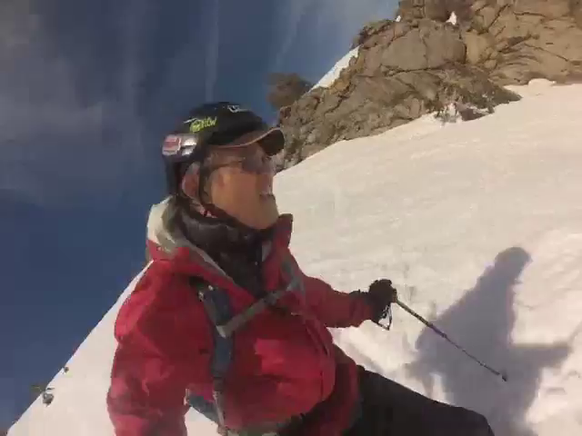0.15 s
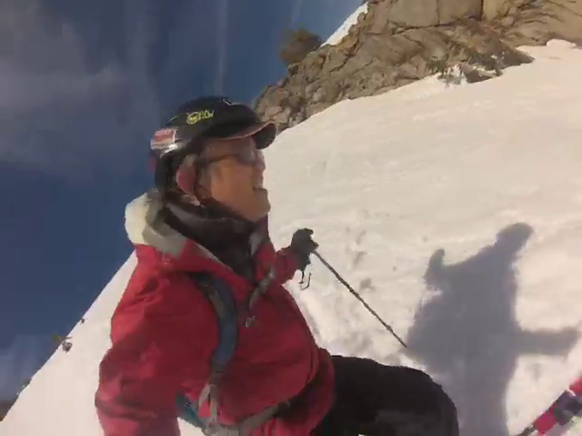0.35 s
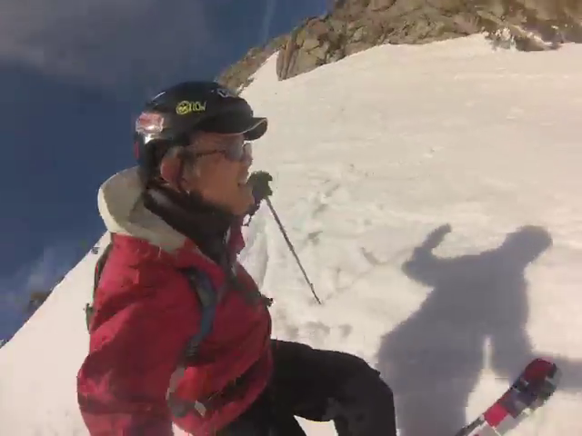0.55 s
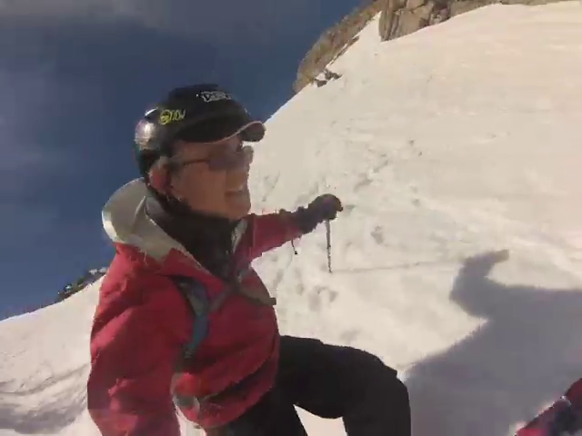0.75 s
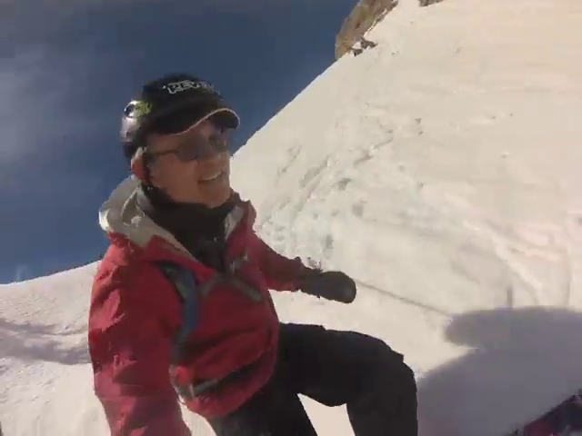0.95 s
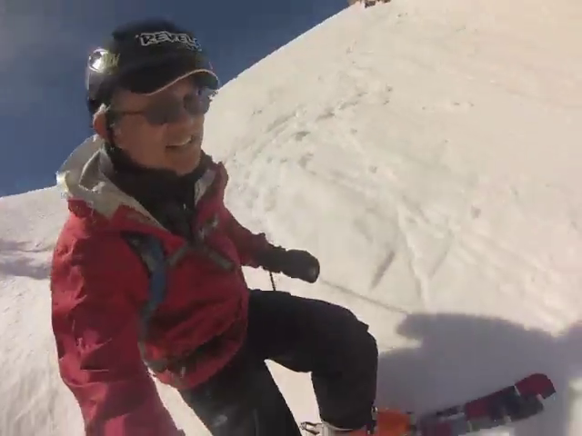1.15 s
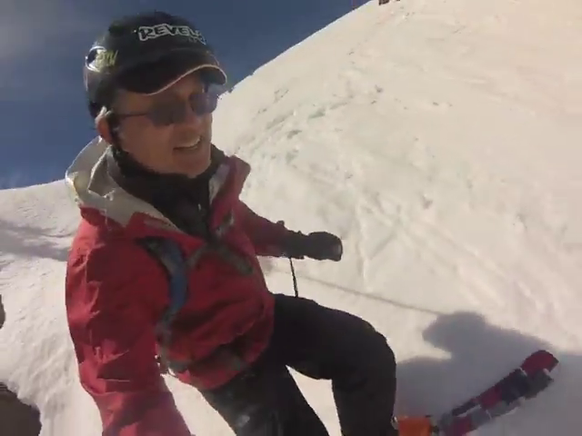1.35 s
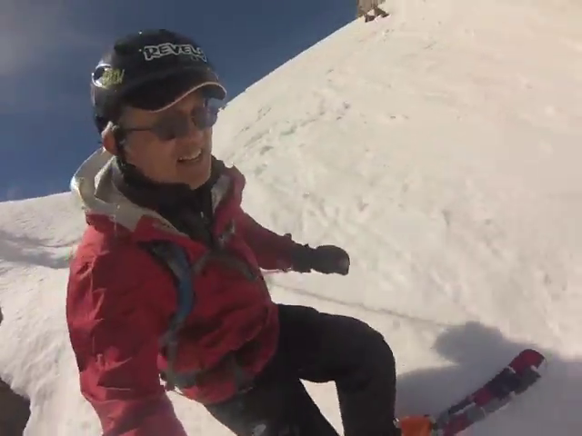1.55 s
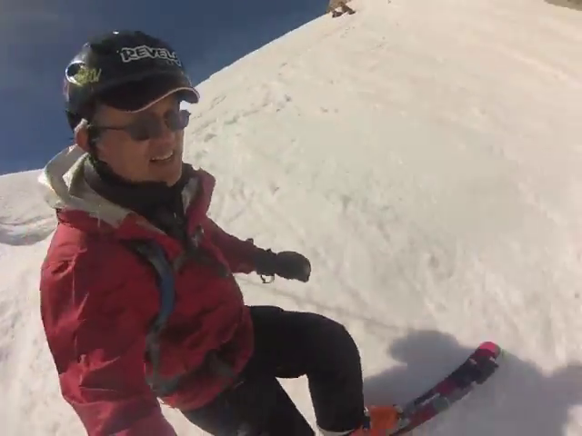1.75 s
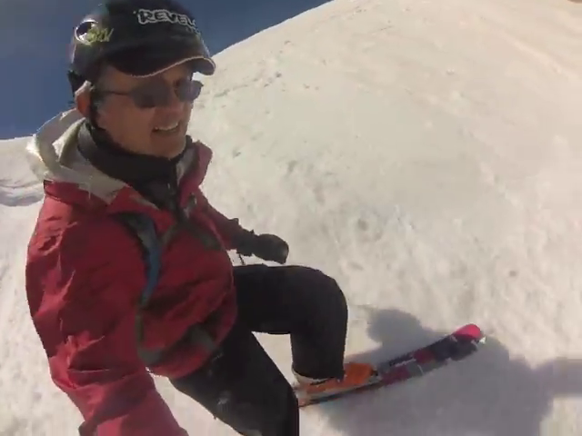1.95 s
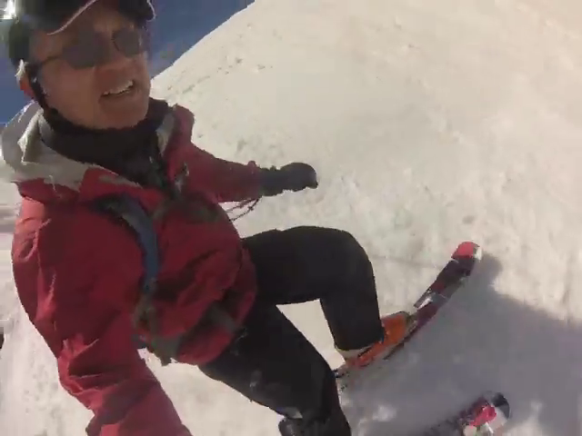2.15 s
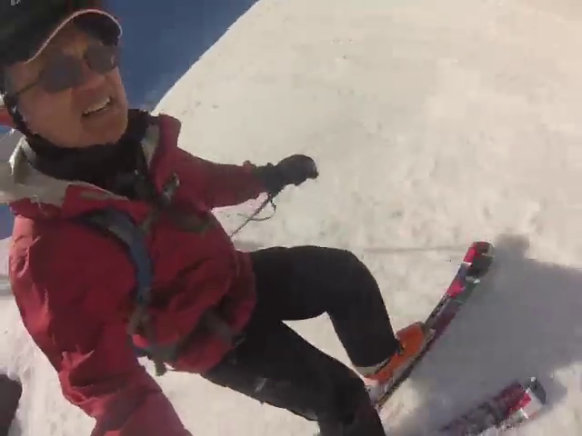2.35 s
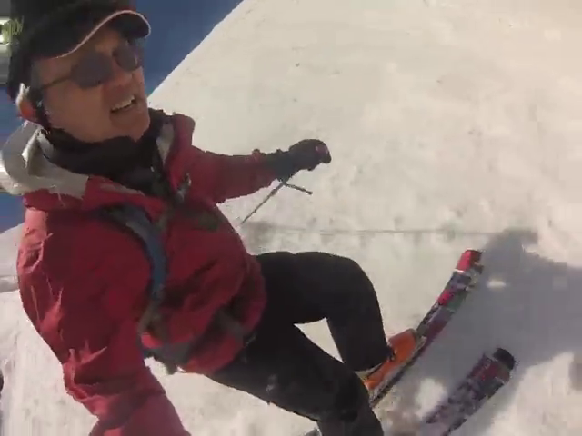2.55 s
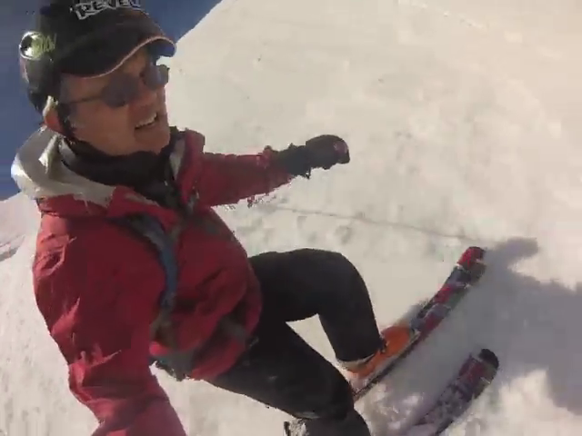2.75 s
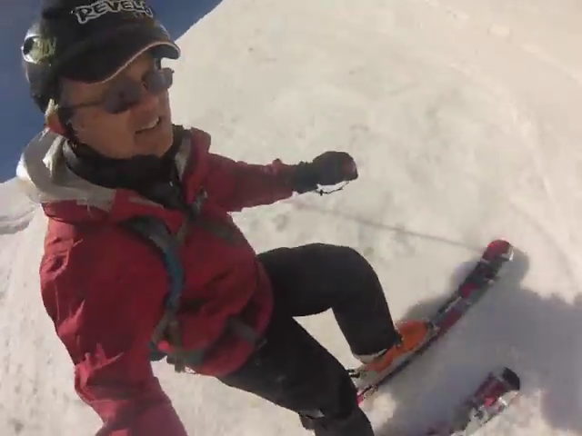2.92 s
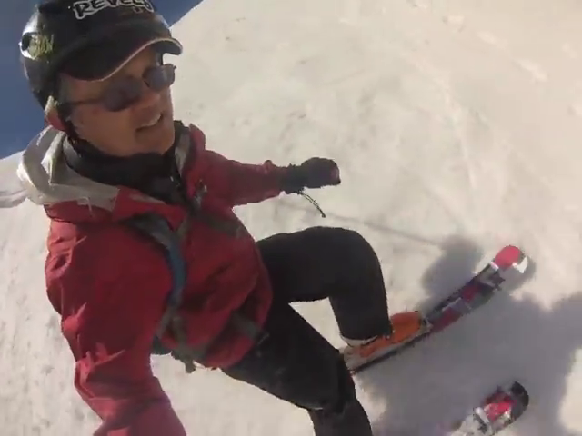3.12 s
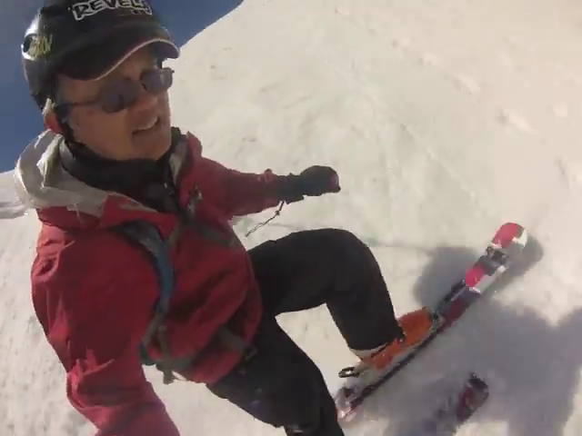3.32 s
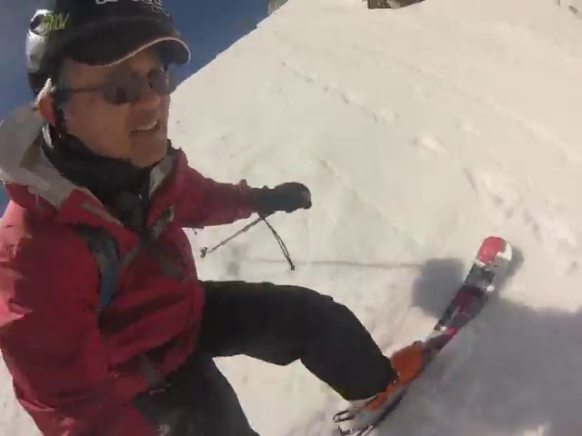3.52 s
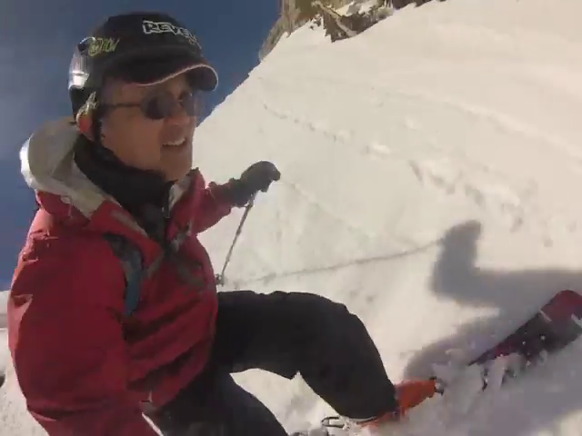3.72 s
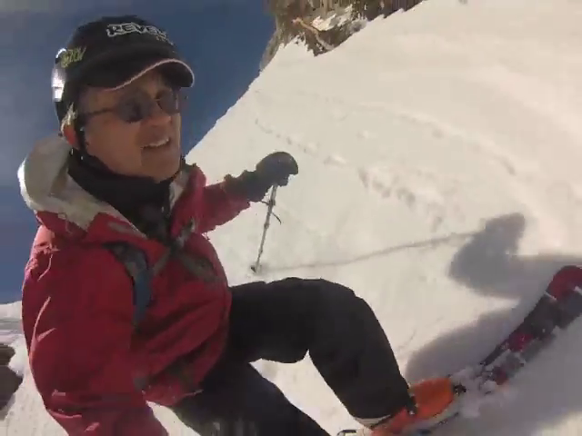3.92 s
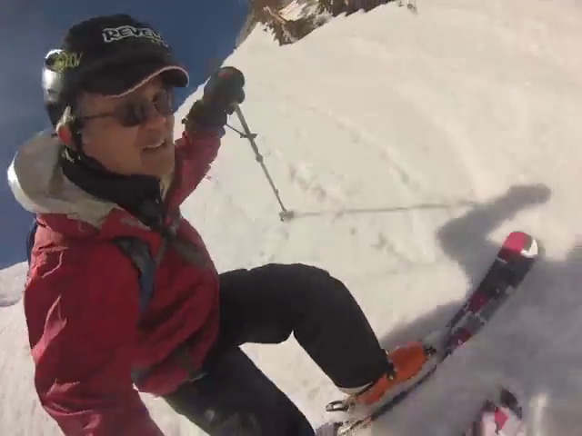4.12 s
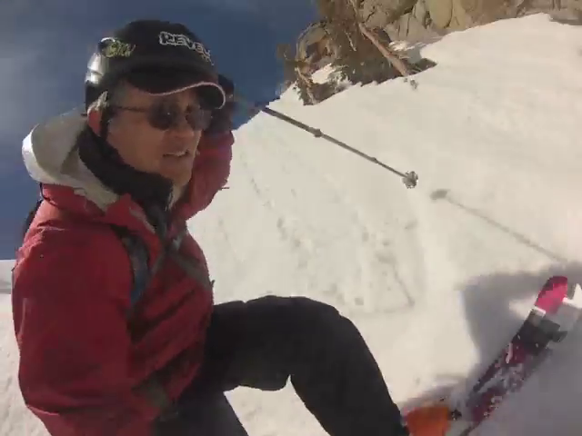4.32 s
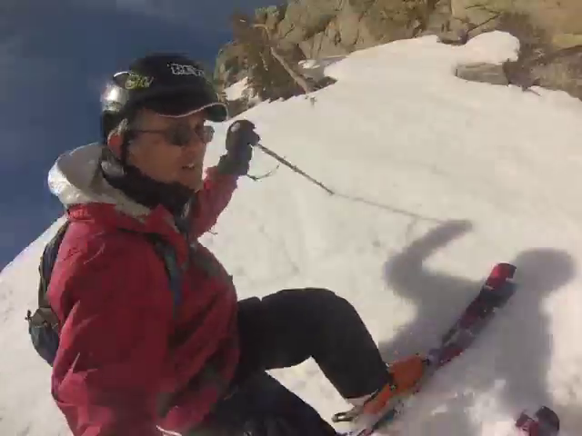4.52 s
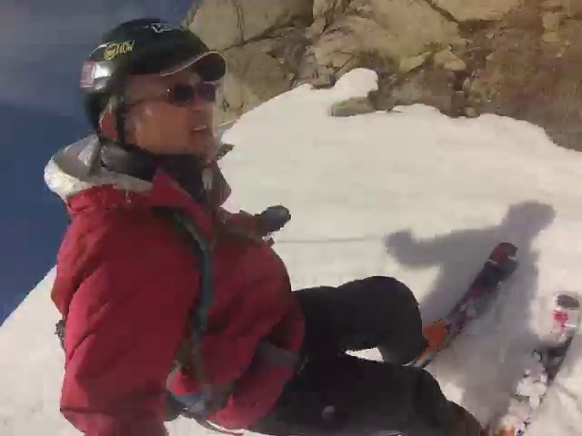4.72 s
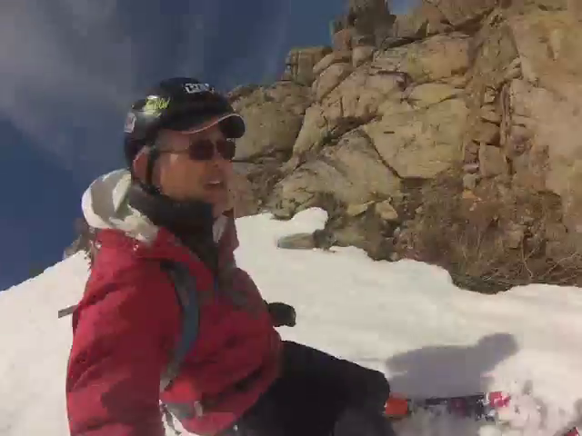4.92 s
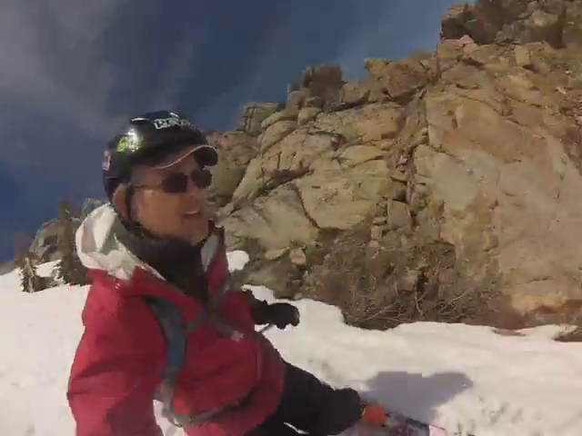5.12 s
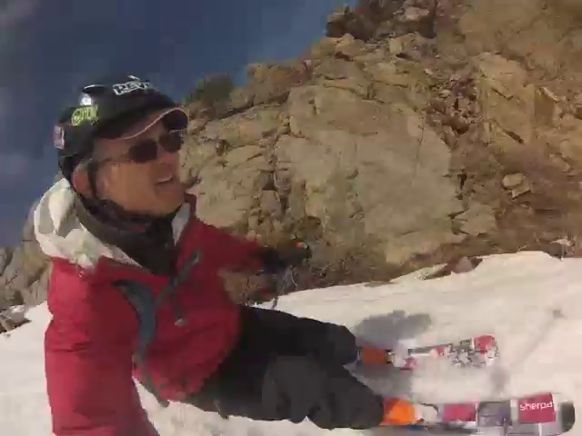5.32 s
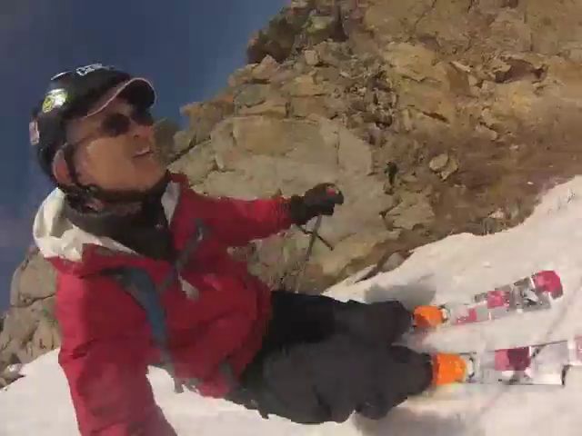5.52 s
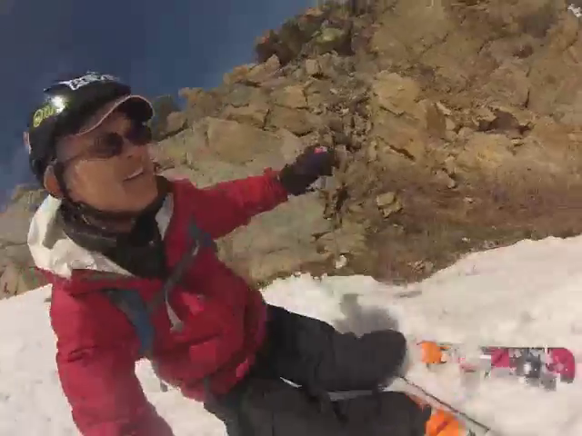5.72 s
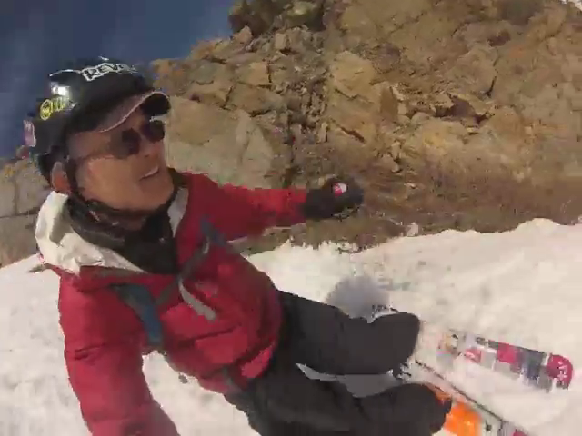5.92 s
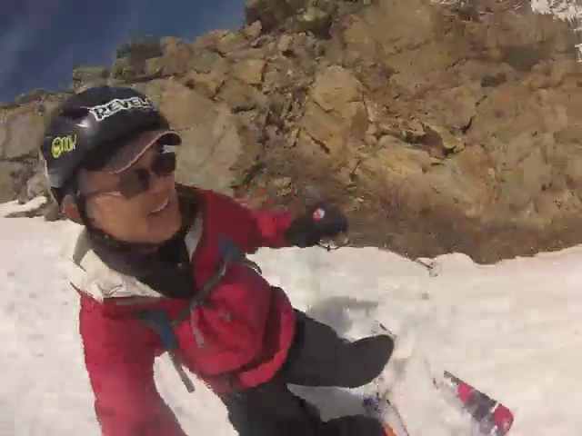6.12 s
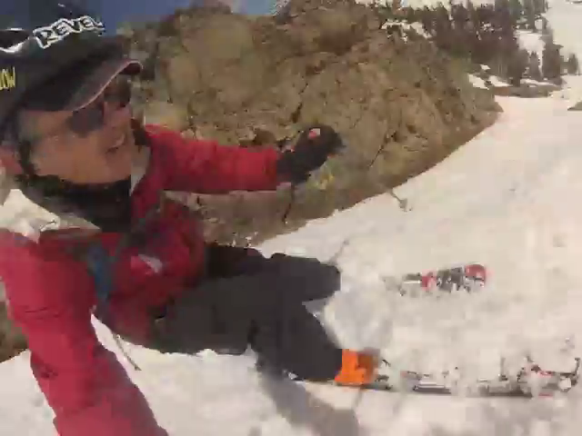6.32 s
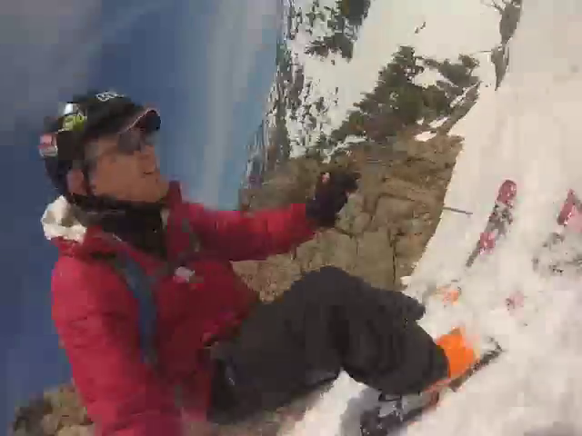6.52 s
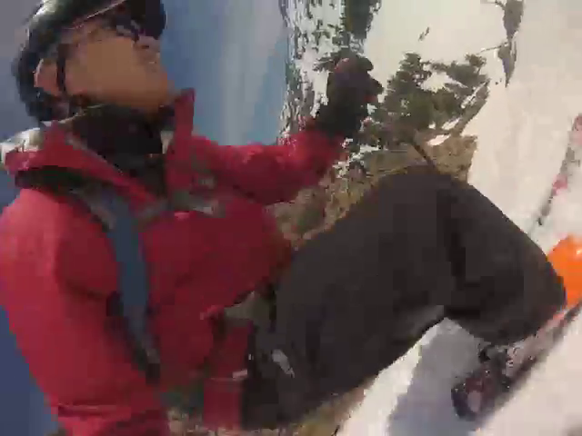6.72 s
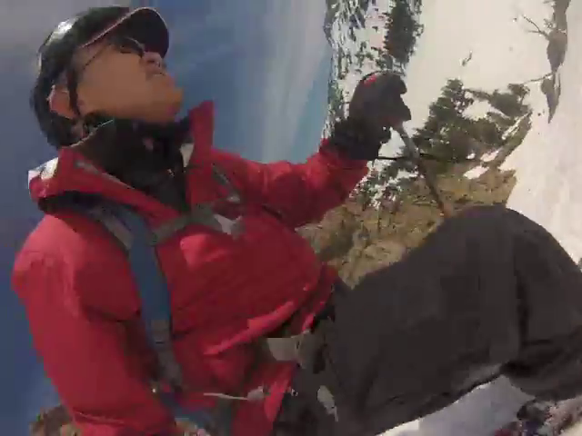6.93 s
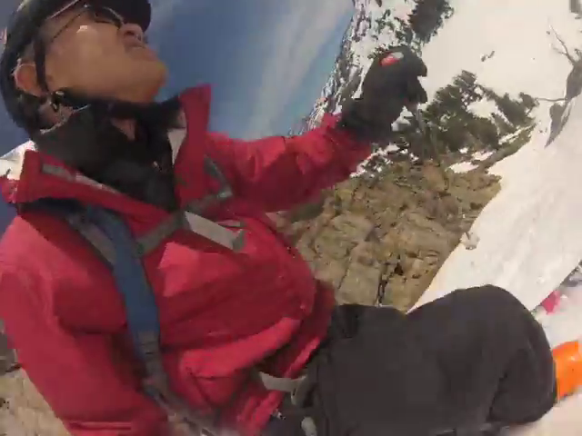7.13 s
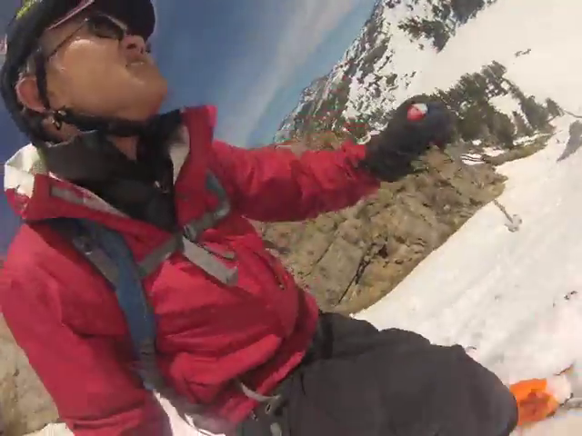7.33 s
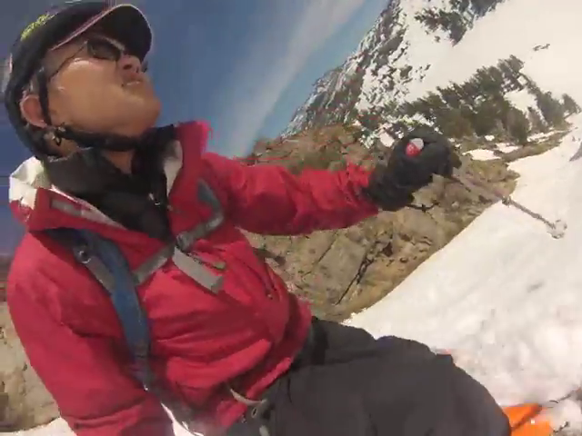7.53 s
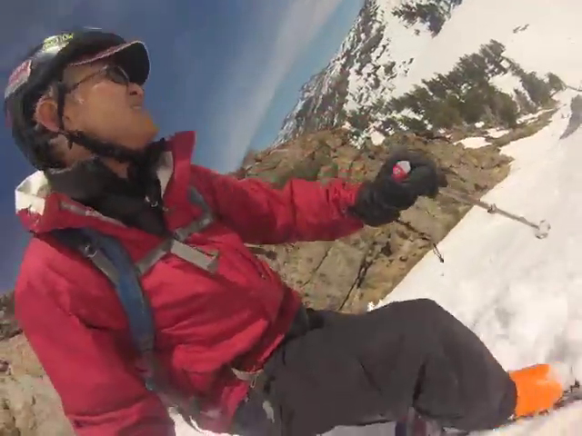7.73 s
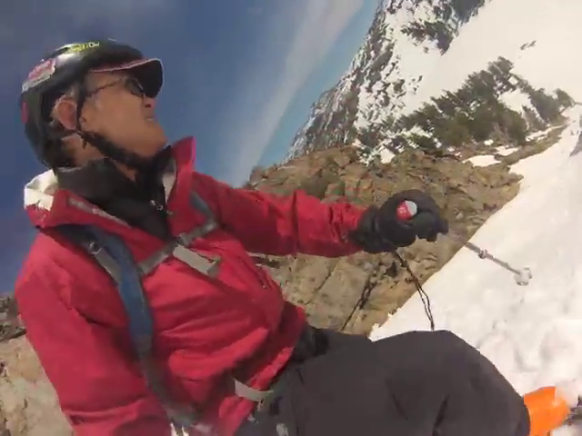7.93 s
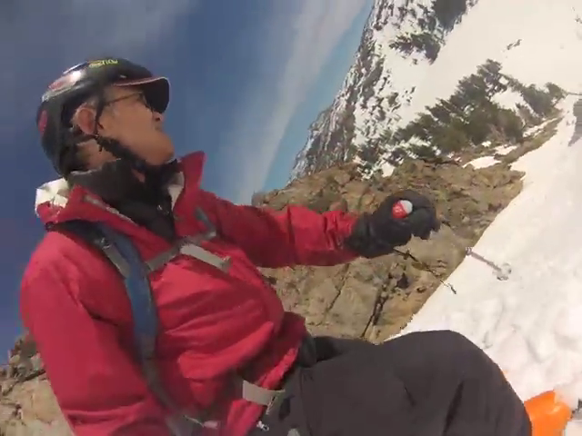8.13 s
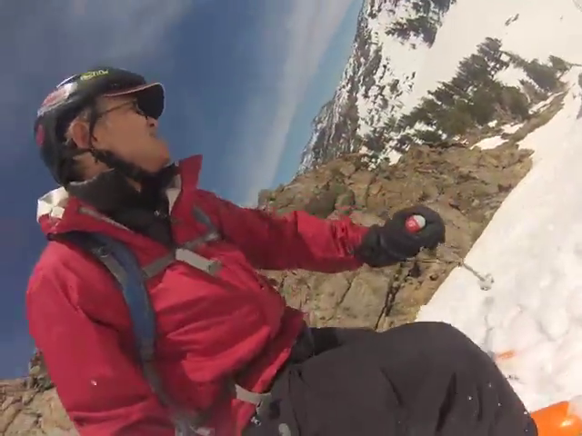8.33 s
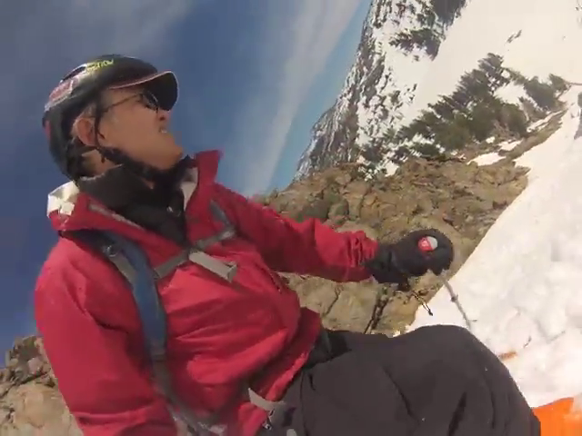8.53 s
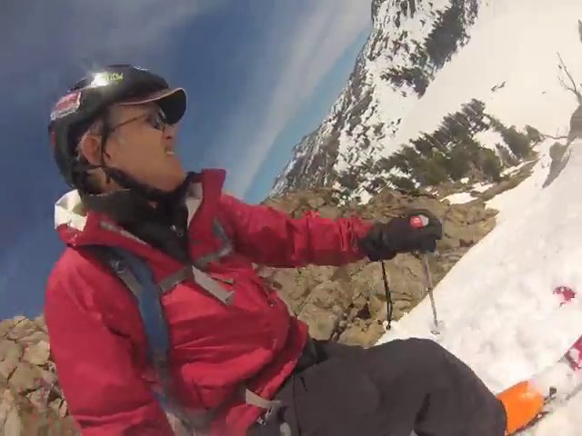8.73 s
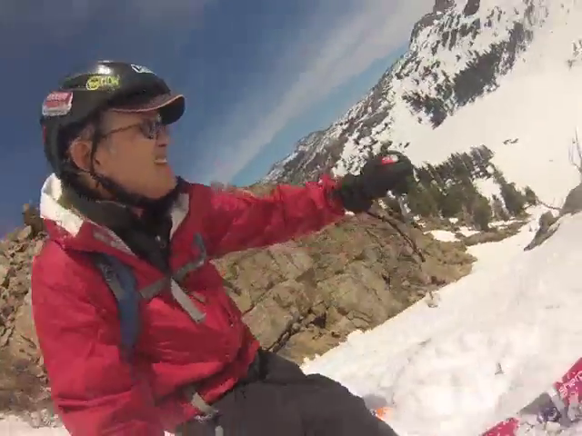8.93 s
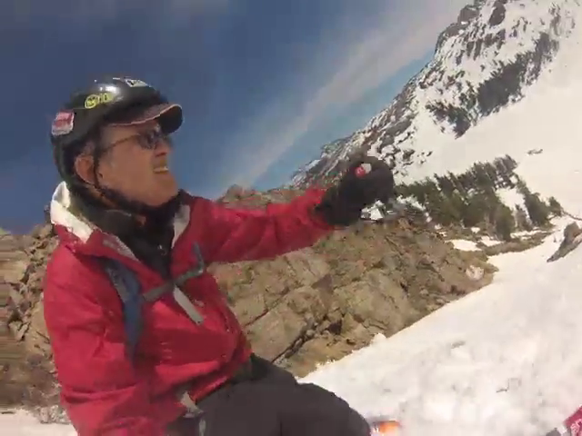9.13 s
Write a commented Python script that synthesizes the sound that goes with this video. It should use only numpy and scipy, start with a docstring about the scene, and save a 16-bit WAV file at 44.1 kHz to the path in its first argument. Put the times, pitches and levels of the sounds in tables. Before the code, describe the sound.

Muffled, close skiing sound: grainy snow hiss and edge scrapes, buffeting wind, a few plastic clacks, one overloaded bang, then a fading glide.

```python
"""Skis hiss and scrape down firm snow, heard by a microphone in a closed plastic case at the end of a pole.
The skis are noise of random snow grains, coloured by the case; wind is band-shaped noise and eddy tones.
Bumps sway the pole in a low wavering tone; clumps, sifting snow and faint low puffs are swells of noise.
Knocks, taps and one hard blow ring damped modes, ice crumbs are short noise ticks.
The blow overloads the microphone and leaves a thin metal ring."""
import sys
import numpy as np
from scipy import signal
from scipy.fft import rfft, irfft, next_fast_len
from scipy.io import wavfile
from scipy.ndimage import map_coordinates

SR = 44100
rng = np.random.default_rng(int(sys.argv[2]) if len(sys.argv) > 2 else 0)


def master_out(mix):
    """Clip the mix to full scale and print it as 16-bit PCM to the path in sys.argv[1]."""
    frames = np.transpose(np.atleast_2d(mix))
    ceiling = np.clip(frames, -1, 1)
    pcm = np.round(ceiling * 32767).astype(np.int16)
    wavfile.write(sys.argv[1], SR, pcm)


N = 408347  # length [samples]


def amp(db):
    """Decibels to gain."""
    return 10 ** (np.asarray(db) / 20)


def unit(x):
    """x at rms 1."""
    return x / np.sqrt(np.mean(x ** 2) + 1e-20)


def peaked(x):
    """x at peak 1."""
    return x / (np.max(np.abs(x)) + 1e-20)


def clock(length):
    """Times [s] of a sound of that many samples."""
    return np.arange(length) / SR


def noise(length):
    """White noise."""
    return rng.standard_normal(length)


def decay(t, t60):
    """Gain that falls 60 dB in t60 seconds."""
    return amp(-60 * t / t60)


def curve(rows):
    """(time, value) points joined by straight lines, one value per sample."""
    times, values = np.transpose(rows)
    return np.interp(clock(N), times, values)


def wobble(rate):
    """A smooth random curve, rate knots a second."""
    knots = noise(int(N * rate / SR) + 4)
    return map_coordinates(knots, [np.arange(N) * rate / SR])


def coloured(x, spectrum):
    """x shaped by (frequency, level) points on a log axis, at rms 1."""
    size = next_fast_len(2 * len(x))
    hz, db = np.transpose(spectrum)
    log_bins = np.log(np.fft.rfftfreq(size, 1 / SR) + 1)
    gain = amp(np.interp(log_bins, np.log(hz), db))
    return unit(irfft(rfft(x, size) * gain, size)[:len(x)])


def muffled(x, top_hz):
    """x with its treble cut steeply above top_hz."""
    return signal.sosfilt(signal.butter(N=4, Wn=top_hz, fs=SR, output="sos"), x)


def grains(rate, spread_db):
    """Tiny fractures of the snow crust: random impulses of uneven size, at rms 1."""
    present = rng.random(N) < rate / SR  # a rate above SR fills every sample
    return unit(present * noise(N) * amp(spread_db * noise(N)))


def swells(rows, rise_s, fall_s):
    """Gain of overlapping events (start, length, level): each rises, holds, then falls 60 dB in fall_s."""
    t, power = clock(N), np.zeros(N)
    for start, length, db in rows:
        near = slice(max(0, int((start - rise_s) * SR)), int((start + length + fall_s) * SR))
        attack = np.clip(1 + (t[near] - start) / rise_s, 0, 1)
        since_end = np.maximum(t[near] - start - length, 0)
        power[near] += (attack * amp(db) * decay(since_end, fall_s)) ** 2
    return np.sqrt(power)


def wavering(hz, drift, rate):
    """A tone of rms 1 whose pitch wanders by the share drift."""
    pitch = hz * (1 + drift * wobble(rate))
    return unit(np.sin(2 * np.pi * np.cumsum(pitch) / SR))


def ring(modes, t):
    """Damped modes of a struck body; neighbours swing in opposite directions."""
    out = np.zeros(len(t))
    for k, (hz, db, t60) in enumerate(modes):
        out += (-1) ** k * amp(db) * decay(t, t60) * np.sin(2 * np.pi * hz * t)
    return out


def add(track, start, sound):
    """Mix a sound into the track at its start time [s]."""
    part = track[round(start * SR):][:len(sound)]
    part += sound[:len(part)]


# how hard the skis press on the snow: (time [s], level [dB])
PRESSURE = [(0, -79.5), (.3, -81.5), (.42, -73.5), (1.45, -72.5), (1.75, -71), (2.35, -74.5), (2.8, -71.5),
            (3.25, -70.5), (3.7, -73.5), (4.3, -73.5), (4.75, -75.5), (5.3, -75), (5.78, -70.5),
            (6.15, -73.5), (6.5, -70.5), (7.6, -77.5), (8.1, -76.5), (8.4, -81.5), (8.7, -77),
            (9.26, -81.5)]
# sideways skids that swell the hiss: (start [s], length [s], level [dB])
SKIDS = [(.14, 0.092, -75), (.43, 0.064, -70.5), (1.52, 0.043, -69.5), (3.19, 0.064, -65),
         (3.48, 0.055, -67.5), (5.72, 0.0267, -62), (5.78, 0.0495, -64), (6.01, 0.0427, -64.5),
         (6.12, 0.105, -67.5), (6.32, 0.095, -67), (7.74, 0.059, -73.5), (8.485, 0.03, -72),
         (8.515, 0.014, -67.5), (8.58, 0.045, -68), (8.78, 0.22, -74)]
# edges biting into the crust: (start [s], length [s], level [dB])
BITES = [(0, 0.764, -70), (.33, 0.0347, -67), (.44, 0.07, -65.5), (.77, 0.447, -65), (.825, 0.062, -60.5),
         (.942, 0.014, -63), (1.004, 0.0101, -66), (1.037, 0.0152, -61.5), (1.5, 0.078, -65),
         (1.69, 0.392, -70), (3.08, 0.19, -70.5), (4.5, 0.069, -70.5), (4.88, 0.0157, -67.5),
         (5.76, 0.134, -68), (7.26, 0.038, -75.5), (8.88, 0.166, -75)]
# the case turning its back to the skis: (time [s], share [0-1])
TURN = [(0, 0.01), (6.25, 0), (6.6, 0.8), (9.26, 0.92)]
# level of the spray's top octave, which grows finer as speed builds: (time [s], level [dB])
FINENESS = [(0, -3.5), (1.2, -5), (2.3, 0.5), (5.5, 2), (6.3, 1), (9.26, 0)]
# colours of the gliding bases, the scraping edges, and the spray from ahead and from behind:
# (frequency [Hz], relative level [dB per Hz])
GLIDE_COLOUR = [(400, -42), (600, -21.5), (950, -16.5), (1150, -9.5), (1300, -2.5), (1400, -8), (1530, -22),
                (1750, -10.5), (2050, -1.5), (2290, -1.5), (2520, -8), (3200, -14.5), (5000, -25),
                (10000, -69.5)]
SCRAPE_COLOUR = [(200, -21), (450, -8), (850, -7), (1000, -6), (1150, -1), (1340, 4), (1450, -3),
                 (1620, -9), (1850, -13), (2200, -11), (2800, -17), (5000, -29.5), (10000, -70)]
SPRAY_AHEAD_COLOUR = [(2000, -24), (3300, -10), (3850, -1.5), (4250, -5), (4750, 0), (5350, -1.5),
                      (5850, -6.5), (6700, 0), (7300, -6), (7750, -3), (8500, -8), (11300, -8.5),
                      (14900, -19), (15500, -60.5)]
SPRAY_BEHIND_COLOUR = [(2000, -27.5), (3100, -6.5), (3600, -8.5), (3900, 4.5), (4400, -7.5), (4750, 1),
                       (5700, -3), (7900, -3), (9100, -9.5), (10000, -5), (11800, -7.5), (15000, -25),
                       (15500, -60)]
LIGHT_DB = -74  # reference pressure
GLIDE_DB, GRIT_DB = -71.5, -76  # base hiss and steady edge grit at the reference pressure
GLIDE_GROWS, GRIT_GROWS = 1, 1  # dB per dB of pressure
FINE_HZ = 10000  # where the top octave of the spray begins


def skis():
    """Bases glide with a fine hiss, edges break the crust in coarse grains and throw a spray of snow."""
    pressure_db = curve(PRESSURE)
    load_db = pressure_db - LIGHT_DB + 0.68 * wobble(7.4)
    chatter = wobble(65)  # uneven snow shakes the skis
    skid = swells(SKIDS, rise_s=0.024, fall_s=0.212)
    bite = swells(BITES, rise_s=0.032, fall_s=0.144)

    sliding = np.hypot(amp(GLIDE_DB + GLIDE_GROWS * load_db), skid)
    glide_grains = coloured(grains(rate=8100, spread_db=0.5), GLIDE_COLOUR)
    glide = sliding * amp(0.66 + 1.0 * chatter) * glide_grains

    cutting = np.hypot(amp(GRIT_DB + GRIT_GROWS * load_db), bite)
    scrape_grains = coloured(grains(rate=3200, spread_db=1.8), SCRAPE_COLOUR)
    scrape = cutting * amp(0.07 + 1.7 * chatter) * scrape_grains

    # skids and bites throw extra snow; powers add
    thrown = np.sqrt(amp(pressure_db) ** 2 + (amp(-11.0) * skid) ** 2 + (amp(-25.0) * bite) ** 2)
    turn = curve(TURN)  # the case colours the treble by direction
    ahead = np.sqrt(1 - turn) * coloured(grains(rate=48000, spread_db=1.5), SPRAY_AHEAD_COLOUR)
    behind = np.sqrt(turn) * coloured(grains(rate=38000, spread_db=1.5), SPRAY_BEHIND_COLOUR)
    spray = thrown * amp(-0.0629 + 0.4 * chatter) * (ahead + behind)
    high_pass = signal.butter(N=4, Wn=FINE_HZ, btype="high", fs=SR, output="sos")
    fine = signal.sosfiltfilt(high_pass, spray)
    return glide + scrape + spray + (amp(curve(FINENESS)) - 1) * fine


# air speed at the case: (time [s], level [dB])
AIRFLOW = [(0, -57.5), (.9, -59), (1.3, -69), (1.55, -66.5), (2.05, -69), (2.2, -70.5), (2.6, -79),
           (2.9, -71.5), (3.35, -70.5), (4.2, -67.5), (4.72, -60), (5.05, -67.5), (5.6, -64.5),
           (6.05, -70.5), (6.42, -60), (7.2, -80), (8.2, -81), (9.26, -74)]
# air flowing straight over the case, at the start and in the fast turns: (time [s], flutter level [dB])
FLUTTERING = [(0, -69.5), (.65, -63.5), (.82, -52), (1.1, -63.5), (1.35, -74), (2.15, -77.5), (2.4, -99),
              (4.2, -94), (4.65, -66), (5.1, -76.5), (6.1, -83), (6.42, -61.5), (6.9, -77.5), (7.3, -92.5)]
# spells of eddy shedding: (start [s], length [s], relative level [dB])
EDDIES = [(.13, 0.176, -42.5), (.42, 0.621, -47), (1.75, .4, -51.5), (2.8, .2, -52), (3.55, 0.273, -50.5),
          (4.9, .08, -44), (5.14, 0.118, -40.5), (5.42, 0.21, -45.5), (5.82, 0.1013, -42.5),
          (6.1, 0.122, -44.5)]
# eddies leaving the pole, lower after the first turn: (time [s], tone [Hz])
EDDY_PITCH = [(0, 106.6), (.9, 100.6), (1.3, 78.88), (3.7, 77), (5.2, 81.9), (6.2, 79.06), (9.26, 78)]
# colours of the buffeting, the boom and the flutter: (frequency [Hz], relative level [dB per Hz])
BUFFET_COLOUR = [(15, -18.5), (30, 0), (42, 2), (55, 0.5), (75, 5.5), (110, -12), (160, -23), (250, -31),
                 (500, -48), (1000, -82)]
BOOM_COLOUR = [(90, -28.5), (150, -7.5), (230, -5.5), (275, 4), (340, 0), (430, -16), (700, -24.5),
               (1200, -44), (3000, -90)]
FLUTTER_COLOUR = [(80, -29.5), (130, -2), (180, 0), (230, -4), (330, -19.5), (700, -49.5), (2000, -100)]
CALM_DB = -70  # reference air level
BUFFET_DB, BUFFET_GROWS = -52.5, 0.69  # buffeting at the reference level; dB per dB of air


def wind():
    """The airflow buffets the case and makes it boom and flutter; the pole sheds eddies in spells."""
    air_db = curve(AIRFLOW)
    spells = swells(EDDIES, rise_s=0.05, fall_s=0.606) * amp(-1.5 + 2.6 * wobble(24))
    eddies = spells * wavering(curve(EDDY_PITCH), drift=0.07, rate=40)
    buffet_db = BUFFET_DB + BUFFET_GROWS * (air_db - CALM_DB) + 2.6 * wobble(12)
    buffet = amp(buffet_db) * coloured(noise(N), BUFFET_COLOUR)
    boom = amp(air_db - 0.58 + 2.4 * wobble(23)) * coloured(noise(N), BOOM_COLOUR)
    flutter = amp(curve(FLUTTERING) + 1.4 * wobble(30)) * coloured(noise(N), FLUTTER_COLOUR)
    return eddies + buffet + boom + flutter


# bumps that set the pole swaying: (time [s], relative level [dB])
JOLTS = [(.07, -41), (.39, -41), (.68, -36.5), (.95, -38.5), (1.5, -47), (2.0, -35), (2.33, -45),
         (3.68, -34.5), (4.38, -38), (4.61, -29), (4.9, -32.5), (5.3, -35), (5.48, -33), (5.639, -29),
         (5.93, -39.5), (6.24, -33.5), (6.4, -25), (6.64, -28), (6.969, -36), (7.35, -38), (7.7, -45),
         (8.48, -42), (8.8, -34), (9.03, -35)]
SWAY_HZ = 28.03  # bending mode
SWAY_REST_DB = -53.5  # sway between bumps, relative like the jolts


def pole():
    """Bumps set the pole swaying at its bending mode."""
    jolts = swells([(time, 0, db) for time, db in JOLTS], rise_s=0.11, fall_s=0.8)
    swing = jolts + amp(SWAY_REST_DB + 4 * wobble(7))
    return amp(-0.5) * swing * wavering(SWAY_HZ, drift=0.045, rate=22)


# faint low puffs of noise: (start [s], length [s], relative level [dB])
PUFFS = [(.03, 0.045, -74.5), (1.97, 0.061, -72), (2.1, 0.01, -71), (4.31, 0.034, -72.5),
         (4.5, 0.177, -70.5), (4.98, 0.045, -71), (5.21, 0.043, -72.5), (5.45, 0.2004, -74.5),
         (5.84, 0.077, -74.5), (6.3, 0.19, -72.5), (6.59, 0.056, -71.5), (6.75, 0.077, -74),
         (6.91, 0.078, -70.5), (8.77, 0.0585, -70), (8.97, 0.0555, -72.5)]
# colour of the puffs, strongest about 300-800 Hz: (frequency [Hz], relative level [dB per Hz])
PUFF_COLOUR = [(200, -17), (350, 2), (500, 1), (700, -0.5), (950, -14.5), (2000, -45.5)]


def puffs():
    """Faint low puffs of noise, about 300-800 Hz, swell briefly and fade."""
    puff = swells(PUFFS, rise_s=0.0247, fall_s=0.12)
    return amp(-2.0) * puff * coloured(noise(N), PUFF_COLOUR)


# knocks of the mount: (time [s], clack, thud and snap [relative dB], treble limit [Hz])
# a lower limit is a softer contact
KNOCKS = [(1.163, -49, -68.5, -74.5, 2500), (1.178, -33, -41.5, -51, 3300),
          (1.2031, -41.5, -45.5, -62, 2600), (1.208, -51, -53.5, -56.5, 3000),
          (1.2125, -53, -61.5, -57.5, 3000), (2.101, -55, -37, -90, 1250), (4.67, -53.5, -34.5, -85, 1100),
          (4.7248, -45, -45.5, -71, 2800), (4.7285, -48, -53, -85.5, 1900),
          (6.271, -48.5, -45.5, -78, 2200), (6.437, -40, -32.5, -68, 2300), (6.4405, -47, -56, -85, 1500)]
# modes of the case shell, and of the mount that the blow rocks too:
# (frequency [Hz], relative level [dB], 60 dB decay [s])
CASE_MODES = [(530, -15, .0215), (720, -7, .024), (860, -6.5, .026), (1150, -2.5, .018), (1350, -1.5, .019),
              (1610, -6, .0068), (1940, -4, .015), (2220, -3.5, .015), (2950, -9, .014)]
MOUNT_MODES = [(280, 1.5, 0.046), (356, -2.5, 0.052)]
# colours of the contact itself, also in the blow, and of the snap: (frequency [Hz], relative level [dB per Hz])
PUSH_COLOUR = [(200, -20), (400, -5), (620, -9), (1000, -1), (2000, 0.5), (2700, -7), (4500, -35.5),
               (9000, -80.5)]
SNAP_COLOUR = [(500, -40), (1500, -17), (2150, 16.5), (3100, -16), (3870, 6), (4500, -18.5), (5800, -4),
               (9500, -29.5), (15000, -60)]


def knocks():
    """Play in the mount: each contact rocks the case, clacks its shell and, if sharp, snaps."""
    out, t = np.zeros(N), clock(SR // 8)
    for time, clack_db, thud_db, snap_db, top_hz in KNOCKS:
        contact = 0.033 * noise(len(t)) * decay(t, 0.0236)  # the joint buzzes briefly
        contact[0] = 1
        shell = peaked(signal.fftconvolve(contact, ring(CASE_MODES, t))[:len(t)])
        push = peaked(coloured(noise(len(t)), PUSH_COLOUR) * decay(t, 0.024))
        clack = amp(clack_db + 3.0) * peaked(shell + 0.597 * push)
        thud = amp(thud_db + 2.5) * peaked(ring(MOUNT_MODES, t))
        snap = amp(snap_db + 2.5) * coloured(noise(len(t)), SNAP_COLOUR) * decay(t, 0.0208)
        add(out, time, muffled(clack + thud, top_hz) + snap)
    return out


# clumps of snow crunching against the case: (start [s], length [s], relative level [dB])
CLUMPS = [(3.2, 0.06, -68.5), (5.78, 0.034, -67), (6.02, 0.017, -64), (6.508, 0.012, -58.5),
          (6.528, 0.03, -53.5), (6.727, 0.024, -56), (6.79, 0.022, -64), (6.97, 0.042, -69.5)]
# colour of the crunch: (frequency [Hz], relative level [dB per Hz])
CLUMP_COLOUR = [(300, -25.5), (900, -14), (1130, -0.5), (1300, 5), (1440, -5), (1600, -14), (1900, -9),
                (2180, -3), (2450, -12.5), (2850, -10.5), (3400, -21.5), (3900, -14.5), (4400, -25),
                (6400, -22.5), (12000, -48)]


def clumps():
    """Thrown clumps of snow burst on the case in a short crunch of coarse grains."""
    burst = swells(CLUMPS, rise_s=0.009, fall_s=0.086) * amp(-0.5 + 0.74 * wobble(110))
    return burst * coloured(grains(rate=3000, spread_db=2.0), CLUMP_COLOUR)


# the hard blow and its rebound: (time [s], relative level [dB])
BLOW = [(4.8146, -0.5), (4.8239, -32)]
# modes of the struck shell, the shove of the case and the ringing metal pole:
# (frequency [Hz], relative level [dB], 60 dB decay [s])
SHELL_MODES = [(820, -5, .0135), (1343, 6.5, .0102), (1947, 13.2, .0085), (2210, 13.8, .009),
               (2400, 4.5, .0128), (2800, -16.5, .018), (3808, -20.4, .019), (4950, -21.4, .0055)]
SHOVE_MODES = [(166, -29, .04)]
POLE_MODES = [(2353, -1.5, .3), (2893, -21.5, .24), (3898, -20, .19), (4290, -24, .13), (4554, -24, .19),
              (4834, -21.5, .26), (5157, -21, .38), (5227, -24, .45), (5329, -25, .38)]


def blow():
    """A hard blow cracks through the shell, rebounds once, rocks the mount and rings the metal pole."""
    out, t = np.zeros(N), clock(SR // 2)
    for time, db in BLOW:
        add(out, time, amp(db) * ring(SHELL_MODES, t))
    pole_ring = amp(-40.0) * ring(POLE_MODES, t)
    rock = amp(-26.5) * ring(MOUNT_MODES, t)
    rattle = amp(-30.0) * coloured(noise(len(t)), PUSH_COLOUR) * decay(t, 0.044)
    first_hit = BLOW[0][0]
    add(out, first_hit, pole_ring + rock + rattle + ring(SHOVE_MODES, t))
    return out


# ice crumbs hitting the case: (time [s], relative peak level [dB], centre [Hz])
CRUMBS = [(6.192, -48, 9500), (6.241, -44, 9000), (6.572, -43, 3700), (6.665, -53, 2600),
          (6.743, -51, 2800), (6.816, -50.5, 5500), (8.52, -52, 3497)]


def crumbs():
    """Bits of thrown ice tick against the case, each a fading burst of noise around its centre."""
    out, t = np.zeros(N), clock(SR // 30)
    for time, db, hz in CRUMBS:
        colour = [(hz / 4, -22), (hz, 0), (hz * 2, -11), (hz * 4, -45)]
        tick = coloured(noise(len(t)), colour) * decay(t, 0.025)
        add(out, time, amp(db - 5.0) * peaked(tick))
    return out


# loose snow over the case: (start [s], length [s], level [dB])
SIFTS = [(6.37, .04, -72), (6.52, .06, -71), (6.63, .19, -74), (6.93, .08, -77)]
# colour of the sifting: (frequency [Hz], relative level [dB per Hz])
SIFT_COLOUR = [(3000, -35), (4400, -18), (4800, 0), (5150, 0), (5700, -15), (6450, -7), (7300, -22),
               (10800, -14), (15000, -45)]


def sifting():
    """Loose snow sifts over the case in a thin hiss."""
    flow = swells(SIFTS, rise_s=0.03, fall_s=0.3)
    return flow * coloured(grains(rate=9000, spread_db=1.5), SIFT_COLOUR)


# light, hard taps on the case: (time [s], peak level before the low cut [dB], treble limit [Hz])
TAPS = [(8.2977, -53, 3000), (8.3124, -54.5, 3000), (8.342, -60, 2800), (8.3508, -37.5, 9800)]
# modes of the tapped shell: (frequency [Hz], relative level [dB], 60 dB decay [s])
TAP_MODES = [(835, -11.5, .0345), (1070, -7.5, .022), (1300, 1, .019), (1685, -19, .02), (2190, 3, .0135),
             (3120, -12, .012), (3600, -5, .013), (3880, -2.5, .014), (5600, -8.5, .004), (6450, -11, .005),
             (8250, -12.5, .005), (9550, -16, .005)]
TAP_LOW_HZ = 650  # low cut: a light tap cannot move the case below this


def taps():
    """Something hard taps the case lightly and rings its shell without rocking the mount."""
    out, t = np.zeros(N), clock(SR // 16)
    for time, db, top_hz in TAPS:
        contact = 0.07 * noise(len(t)) * decay(t, 0.0071)
        contact[0] = 1
        shell = signal.fftconvolve(contact, ring(TAP_MODES, t))[:len(t)]
        add(out, time, amp(db) * peaked(muffled(shell, top_hz)))
    low_cut = signal.butter(N=3, Wn=TAP_LOW_HZ, btype="high", fs=SR, output="sos")
    return signal.sosfilt(low_cut, out)


def scene():
    """Everything reaches one microphone inside the case."""
    steady = skis() + wind() + pole()
    snow = clumps() + crumbs() + sifting()
    strikes = knocks() + blow() + taps()
    return (steady + puffs() + snow + strikes)[None]


TOP_HZ = 15900  # band limit


def record(dry):
    """The microphone overloads at full scale; a steep filter then cuts the sound above the band limit."""
    overloaded = np.clip(dry, -1, 1)
    low_pass = signal.butter(N=12, Wn=TOP_HZ, fs=SR, output="sos")
    return signal.sosfiltfilt(low_pass, overloaded)


dry = scene()
out = record(dry)
master_out(out)
```